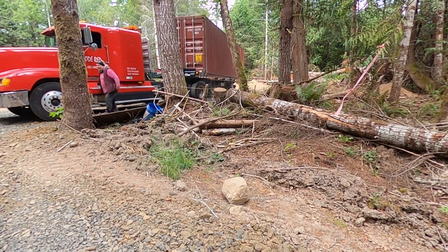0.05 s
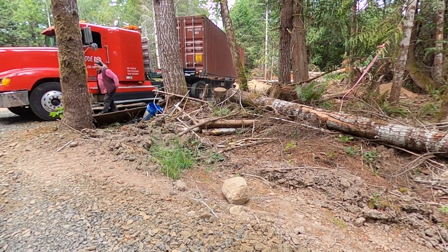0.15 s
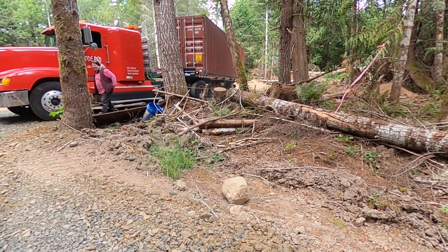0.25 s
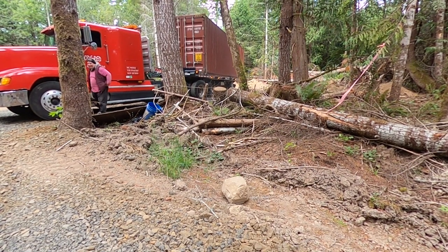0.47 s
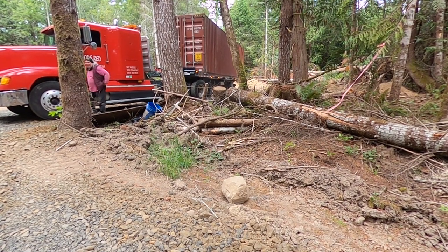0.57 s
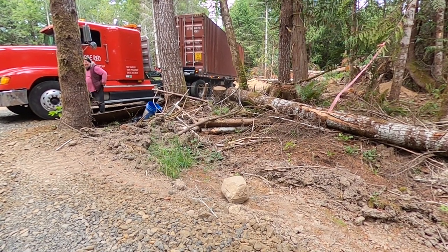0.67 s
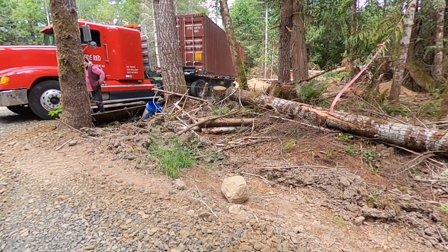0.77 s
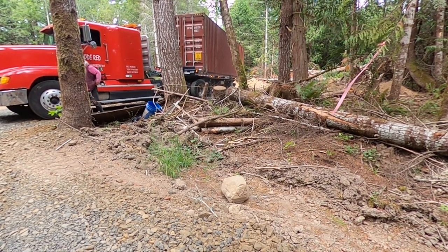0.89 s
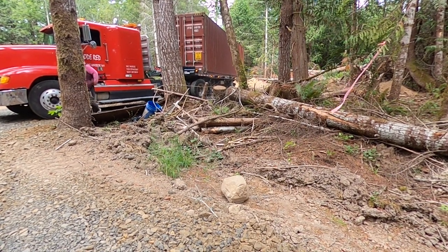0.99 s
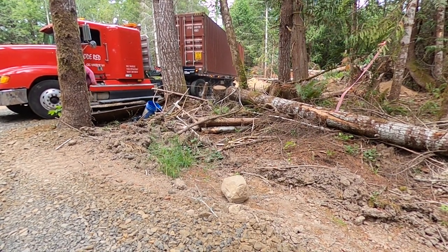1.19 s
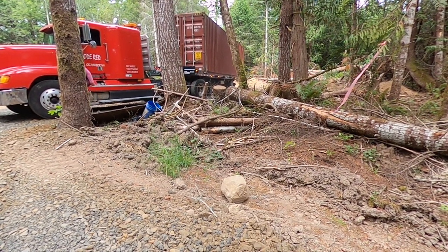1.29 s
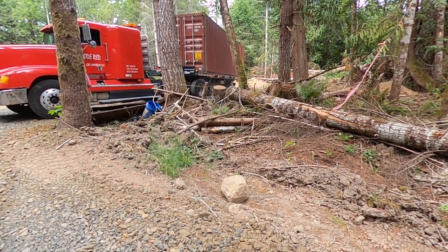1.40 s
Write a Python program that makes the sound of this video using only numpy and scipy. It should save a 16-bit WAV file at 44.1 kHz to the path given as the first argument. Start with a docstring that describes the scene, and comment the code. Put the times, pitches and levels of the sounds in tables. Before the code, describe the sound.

A heavy metal clunk on a truck at a wooded gravel site. Faint ticks begin at 0.15 seconds, then a loud, hard clack at 0.22 and a second, rattling hit near 0.3, with deep thuds until about 0.4. The trees scatter a short tail. Faint grit crunches around 0.6-0.75, a lighter hollow knock lands at 1.0, and tiny snaps follow near 1.15 and 1.4. Low fluttering engine rumble and soft air continue throughout.

```python
"""A heavy metal clunk beside a parked truck on a gravel forest road: light ticks, a hard double clack, a rattle and a deep thud.
Metal contacts are bursts of filtered noise plus ringing modes; soft pushes ring low body modes for the thud.
Clouds of tiny clicks make the rattle and crunching grit; a lighter, hollow knock follows, built like the clack.
The trees scatter all but the thud, over a low engine rumble of noise and fluttering harmonics, and forest air of noise."""
import sys
import numpy as np
from scipy import signal
from scipy.io import wavfile

SR = 44100
rng = np.random.default_rng(int(sys.argv[2]) if len(sys.argv) > 2 else 0)


def inscribe(sig):
    """Save sig as 16-bit PCM at rate SR to the path in sys.argv[1].

    A 1-D sig is mono; a 2-D sig holds one channel per row.
    Samples are clipped to [-1, 1] before scaling.
    """
    pcm = np.round(np.clip(np.atleast_2d(sig).T, -1, 1) * 32767)
    wavfile.write(sys.argv[1], SR, pcm.astype(np.int16))


N = 63945
T = np.arange(N) / SR  # time in seconds
EDGES = 18 * 2 ** (np.arange(30) / 3)  # third-octave band edges in Hz


def from_db(db):
    """Decibels to gain."""
    return 10 ** (np.asarray(db) / 20)


def rms_one(x):
    """Scale to unit rms."""
    return x / np.sqrt(np.mean(x ** 2) + 1e-20)


def at_hz(points, hz):
    """Read a curve of (Hz, dB) on a log-frequency axis."""
    table = np.array(points)
    return np.interp(np.log(hz), np.log(table[:, 0]), table[:, 1])


def level_curve(points):
    """Gain over time, drawn in straight dB lines between points of (s, dB)."""
    return from_db(np.interp(T, *np.transpose(points)))


def dying(t, t60):
    """Exponential decay from t = 0, losing 60 dB in t60 seconds; silent before."""
    return (t >= 0) * np.exp(-np.log(1000) * np.maximum(t, 0) / t60)


def bands(spectrum):
    """Third-octave bands as (centre Hz, filter, gain); together they give unit noise about unit rms."""
    centres = np.sqrt(EDGES[1:] * EDGES[:-1])
    gains = from_db(at_hz(spectrum, centres))
    gains = gains / np.sqrt(np.sum(gains ** 2 * np.diff(EDGES)) * 2 / SR)
    filters = [signal.butter(2, EDGES[k:k + 2], "band", fs=SR, output="sos") for k in range(len(centres))]
    return list(zip(centres, filters, gains))


# Stereo width of the blows. Each row: frequency in Hz, side level in dB against the middle.
BLOW_WIDTH = [(30, -43), (850, -43), (1400, -16), (5000, -14), (9000, -12.5), (14000, 1)]
# Lean of the blows across the stereo image. Each row: frequency in Hz, left minus right in dB.
BLOW_LEAN = [(30, 1.5), (850, -0.5), (1300, 0), (2800, 2), (5500, 0.5), (9000, 2.5), (14000, 4)]


def spread(mid, side, hz, width=BLOW_WIDTH, lean=1):
    """Place one band in stereo, with the width and left-right lean of its frequency."""
    sign = np.array([[1], [-1]])  # left, right
    stereo = mid + sign * side * from_db(at_hz(width, hz))
    return stereo * from_db(sign * lean * at_hz(BLOW_LEAN, hz) / 2)


ACCENT_OCTAVES = 0.15  # width of the range that a point of contact favours


def accent(hz, centre_hz, db):
    """Extra dB for the resonances that a point of contact favours."""
    return db * np.exp(-.5 * (np.log2(hz / centre_hz) / ACCENT_OCTAVES) ** 2)


def contact_db(row, hz):
    """Level of one contact at one frequency: its level, its tilt about 2 kHz and its accent."""
    _, db, tilt, centre, extra = row
    return db + tilt * np.log2(hz / 2000) + accent(hz, centre, extra)


TREBLE_DAMPING = 0.21  # power of frequency by which decays shorten
ATTACK_CYCLES = 0.86  # each resonance of a blow takes about this many cycles to build


def blows(rows, spectrum, t60):
    """Each contact sets off a dense cluster of dying resonances, the treble dying first; t60 holds at 1 kHz."""
    out, white = 0, rng.standard_normal((2, 2, N))
    for k, (hz, sos, gain) in enumerate(bands(spectrum)):
        if hz < spectrum[0][0]:
            continue
        life = t60 * (hz / 1000) ** -TREBLE_DAMPING
        # power falls twice as fast in dB as amplitude would, hence half the life
        power = sum(from_db(contact_db(row, hz)) ** 2 * dying(T - row[0], life / 2) for row in rows)
        r = np.exp(-hz / (ATTACK_CYCLES * SR))
        envelope = signal.lfilter([1 - r], [1, -r], np.sqrt(power) + 1e-18)
        noise = signal.sosfilt(sos, spread(*white[k % 2], hz))
        out = out + gain * envelope * noise
    return out


def ring(force, hz, t60):
    """A resonator: a unit click sets a dying sine of starting height 1 ringing."""
    r, w = np.exp(-np.log(1000) / (t60 * SR)), 2 * np.pi * hz / SR
    return signal.lfilter([0, np.sin(w)], [1, -2 * r * np.cos(w), r * r], force + 1e-18)


def struck(rows, modes, spread_db):
    """Every contact strikes every mode with a strength of its own."""
    out, luck = 0, rng.standard_normal((len(rows), len(modes)))
    places = (np.array([row[0] for row in rows]) * SR).astype(int)
    for k, (hz, mode_db, t60) in enumerate(modes):
        strengths_db = np.array([contact_db(row, hz) for row in rows]) + mode_db + spread_db * luck[:, k]
        clicks = np.zeros(N)
        clicks[places] = from_db(strengths_db)
        out = out + spread(ring(clicks, hz, t60), 0, hz)
    return out


def grains(swells, spectrum, per_s, spread_db):
    """Swells of many tiny uneven clicks, coloured band by band."""
    power = 0
    for s, db, rise, t60 in swells:
        shape = np.where(T < s, np.exp(-((T - s) / rise) ** 2), dying(T - s, t60))
        power = power + (from_db(db) * shape) ** 2
    sizes = from_db(spread_db * np.minimum(rng.exponential(1, N), 3))
    sizes = sizes * (rng.random(N) < per_s / SR)  # thin out to per_s clicks a second
    clicks = np.sqrt(power) * rms_one(sizes) * rng.choice([-1, 1], (2, 2, N))
    out = 0
    for k, (hz, sos, gain) in enumerate(bands(spectrum)):
        if hz > spectrum[0][0]:
            out = out + gain * signal.sosfilt(sos, spread(*clicks[k % 2], hz) + 1e-18)
    return out


# Stereo width of the background noise. Each row: frequency in Hz, side level in dB against the middle.
AIR_WIDTH = [(60, -20.5), (110, -19.5), (200, -14.5), (380, -10), (700, -17.5), (1290, -2), (2380, 1),
             (4400, -3.5), (8120, -14), (15000, 3)]


def wash(spectrum, levels):
    """Coloured noise, scaled to unit rms, that follows a level curve."""
    white = rng.standard_normal((2, 2, N + SR // 2))  # the first half second lets the filters settle
    noise = 0
    for k, (hz, sos, gain) in enumerate(bands(spectrum)):
        noise = noise + gain * signal.sosfilt(sos, spread(*white[k % 2], hz, AIR_WIDTH, lean=0))
    return rms_one(noise[:, -N:]) * level_curve(levels)


# Colour of the forest air; only its shape counts. Each row: frequency in Hz, density in dB per Hz.
AIR_COLOUR = [(250, -5), (400, -7.5), (530, -7), (780, -22.5), (1050, -12), (1250, -13.5), (1550, -11.5),
              (1850, -16), (2200, -19), (3400, -23.5), (4600, -28.5), (6800, -23.5), (9500, -41.5),
              (12000, -37.5), (15000, -48)]
# Loudness of the air. Each row: time in seconds, level in dB.
AIR_LOUDNESS = [(0, -63), (.11, -66.5), (.55, -72), (.7, -71), (0.919, -67.5), (1.1, -69), (1.24, -73),
                (1.4, -66.5), (1.45, -69.5)]


def forest_air():
    """Broad noise whose level wanders."""
    return wash(AIR_COLOUR, AIR_LOUDNESS)


# Colour of the engine rumble; only its shape counts. Each row: frequency in Hz, density in dB per Hz.
RUMBLE_COLOUR = [(20, 2.5), (40, 4.5), (65, 7.5), (100, 1), (140, -3), (200, -9.5), (270, -14.5),
                 (400, -26.5), (650, -46), (1200, -56.5)]
# Loudness of the rumble. Each row: time in seconds, level in dB.
RUMBLE_LOUDNESS = [(0, -55), (.1, -52), (.55, -51), (.64, -54), (.73, -52), (.86, -57), (0.929, -51.5),
                   (1.02, -58), (1.1, -55.5), (1.2, -56), (1.45, -57.5)]


def rumble():
    """Bass-heavy noise, rising and sinking."""
    return wash(RUMBLE_COLOUR, RUMBLE_LOUDNESS)


def drift(rate):
    """Slow random wander of unit rms: noise through two equal low-pass poles at rate Hz."""
    r = np.exp(-2 * np.pi * rate / SR)
    return rms_one(signal.lfilter([1], [1, -2 * r, r * r], rng.standard_normal(2 * N))[N:])


IDLE_HZ, IDLE_WAVER = 64.45, .012  # mean firing rate of a distant engine; rms share by which it wanders
IDLE_FLUTTER = 0.6  # depth of each harmonic's flutter
# Harmonics of the engine. Each row: multiple of the firing rate, level in dB before flutter and swell.
ENGINE_ORDERS = [(1, -70), (2, -64.5), (3, -66), (4, -73.5), (5, -79.5), (6, -78)]
# Swell of the engine. Each row: time in seconds, added level in dB.
ENGINE_SWELL = [(0, -8), (.5, -2), (.65, -4), (.85, -1), (1.08, 2.5), (1.25, -5), (1.45, 3.5)]


def engine():
    """A faint engine hum: a few fluttering multiples of the wandering firing rate."""
    phase = 2 * np.pi * np.cumsum(IDLE_HZ * (1 + IDLE_WAVER * drift(3.34))) / SR
    hum = 0
    for multiple, db in ENGINE_ORDERS:
        flutter = 1 + IDLE_FLUTTER * drift(8.2)
        tone = np.sin(round(multiple) * phase + rng.uniform(0, 2 * np.pi))
        hum = hum + np.sqrt(2) * from_db(db) * flutter * tone
    return hum * level_curve(ENGINE_SWELL)


WOODS_T60_S, WOODS_BUILD_S = 0.4, 0.0051
# Scatter from the trunks. Each row: frequency in Hz, level in dB against the direct sound.
WOODS_SCATTER = [(100, -1.5), (500, -8), (680, -13), (850, -11), (1100, -4.5), (1600, -11), (4000, -12.5),
                 (8000, -11.5), (15000, -17)]


def woods(x):
    """Diffuse scatter from trunks and ground that builds quickly and dies away."""
    shape = dying(T, WOODS_T60_S) * (1 - np.exp(-T / WOODS_BUILD_S))
    white = rng.standard_normal((2, 2, N)) * shape / np.sqrt(np.sum(shape ** 2))
    echo = 0
    for k, (hz, sos, _) in enumerate(bands(WOODS_SCATTER)):
        echo = echo + from_db(at_hz(WOODS_SCATTER, hz)) * signal.sosfilt(sos, spread(*white[k % 2], hz, lean=0))
    return signal.fftconvolve(x, echo, axes=1)[:, :N]


SNAP_T60_S = 0.018  # at 1 kHz
GRIT_PER_S, GRIT_SPREAD_DB = 2100, -1.5  # clicks a second; unevenness of their sizes
# Grit snapping. Each row: start in seconds, level in dB, treble tilt in dB per octave,
# favoured frequency in Hz, its accent in dB.
GRIT_SNAPS = [(.5652, -63.5, -2.5, 2880, 3), (.5886, -57, 0, 3100, 7.5), (.63, -52, -12, 2400, -1),
              (.6974, -66.5, 2, 5100, 12.5), (.7193, -61.5, 6, 7700, 7), (.739, -66, 4, 2960, 7),
              (1.155, -68, 3, 1300, 19), (1.3928, -65, 3, 5500, 3)]
# Grit crunching. Each row: time of the top in seconds, level in dB, rise in seconds, t60 in seconds.
GRIT_CRUNCHES = [(.03, -71, 0.06, 0.95), (.6, -74, 0.052, 0.72), (.652, -67, 0.047, 0.17),
                 (.73, -73, 0.058, 0.24), (1.41, -75, 0.029, 0.47)]
# Colour of the grit; only its shape counts. Each row: frequency in Hz, density in dB per Hz.
GRIT_COLOUR = [(500, -44), (1500, -28), (2300, 2), (3100, -0.5), (4500, -15), (7500, -14), (10000, -55),
               (15000, -20)]


def grit():
    """Gravel and dry needles crunch faintly, with single snaps."""
    snaps = blows(GRIT_SNAPS, GRIT_COLOUR, SNAP_T60_S)
    return snaps + grains(GRIT_CRUNCHES, GRIT_COLOUR, GRIT_PER_S, GRIT_SPREAD_DB)


KNOCK_T60_S, KNOCK_RING_DB = .05, -11  # decay of the noise at 1 kHz; gain of the ringing modes
# Touches of the knock. Each row: start in seconds, level in dB, treble tilt in dB per octave,
# favoured frequency in Hz, its accent in dB.
KNOCK_TOUCHES = [(1.0007, -51, -2, 3060, 4), (1.0035, -52.5, -0.5, 900, 4.5), (1.008, -53.5, -1, 7700, 1),
                 (1.026, -64.5, -6.5, 740, 4), (1.04, -64.5, -5, 863, 16.5)]
# Colour of the knock; only its shape counts. Each row: frequency in Hz, density in dB per Hz.
KNOCK_COLOUR = [(200, -17), (420, 6), (700, 0), (1000, 4), (1750, -0.5), (2200, -12), (3200, -6.5),
                (4500, -20), (7700, -9), (9500, -93), (15000, -52)]
# Modes of the hollow body. Each row: frequency in Hz, relative level in dB, t60 in seconds.
HOLLOW_MODES = [(412, -4, .09), (540, -4, 0.093), (749, -5, 0.13), (946, 0.5, 0.096), (1085, -11, 0.093),
                (1910, -3, .06), (2600, -7, .05), (3300, -11, 0.073), (7540, -9, 0.043)]


def knock():
    """A light hollow knock that settles in a few dull touches."""
    modes = struck(KNOCK_TOUCHES, HOLLOW_MODES, spread_db=1.5)
    return blows(KNOCK_TOUCHES, KNOCK_COLOUR, KNOCK_T60_S) + from_db(KNOCK_RING_DB) * modes


# Heavy pushes on the body. Each row: start in seconds, level in dB, contact time in seconds,
# favoured frequency in Hz, its accent in dB.
BODY_PUSHES = [(0.192, -39, 0.0071, 93.4, 18), (0.232, -21.5, 0.0034, 148, 3),
               (0.248, -22.5, 0.013, 42, 10), (0.312, -24.5, 0.0056, 95.5, 9),
               (0.344, -26, 0.00643, 84.04, 20.5), (0.381, -41, 0.00558, 166, 12),
               (0.417, -40.5, .006, 94.4, 18), (.476, -42, 0.0089, 45.2, 12),
               (0.501, -57, 0.0039, 78.8, 24), (0.704, -41.5, 0.0086, 63, -14),
               (0.91, -61, 0.023, 43.6, 11), (1.072, -46, 0.01, 73, 0)]
# Modes of the body. Each row: frequency in Hz, relative level in dB, t60 in seconds.
BODY_MODES = [(44.6, -3, 0.23), (75.53, -10.5, 0.47), (96.6, -5.5, 0.18), (152.6, -1, 0.12),
              (173.6, -3, 0.23), (234.3, -0.5, .13), (273.5, -0.5, 0.12), (356, -10, 0.085)]


def thud():
    """Soft pushes ring the body's low modes; a longer contact gives a deeper thud."""
    s, db, length, centre, extra = np.transpose(BODY_PUSHES)
    pushes = np.sin(np.pi * np.clip((T - s[:, None]) / length[:, None], 0, 1)) ** 2
    pushes = pushes / pushes.sum(axis=1, keepdims=True)  # equal total push
    out = 0
    for hz, mode_db, t60 in BODY_MODES:
        force = from_db(db + mode_db + accent(hz, centre, extra)) @ pushes
        out = out + ring(force, hz, t60)
    return out


CLACK_T60_S, CLACK_RING_DB = 0.058, -16  # decay of the noise at 1 kHz; gain of the ringing modes
RATTLE_PER_S, RATTLE_SPREAD_DB = 4000, 4  # clicks a second; unevenness of their sizes
# Metal contacts. Each row: start in seconds, level in dB, treble tilt in dB per octave,
# favoured frequency in Hz, its accent in dB.
METAL_CONTACTS = [(.1525, -69, 2.5, 7340, 19), (.1615, -63.5, -3, 1464, 25.5), (.1625, -70, 5, 7500, 8),
                  (.171, -69.5, 4, 7200, 19), (.179, -66, -4, 700, 10), (.191, -63, -9.5, 600, -24),
                  (.202, -57.5, 0.5, 1400, 17), (.2224, -35, -1.5, 6000, 1), (.2295, -34, -1.5, 3150, 7),
                  (.232, -45, 2.5, 533, -3), (.2403, -45.5, 5, 790, 19), (.2555, -55.5, 5.5, 3900, 12),
                  (.2828, -45.5, 4.5, 6100, 4), (.2935, -47.5, 3.5, 645, 23), (.302, -47.5, -1, 1430, 9),
                  (.3505, -53.5, 0, 1310, 6)]
# Colour of the clack; only its shape counts. Each row: frequency in Hz, density in dB per Hz.
CLACK_COLOUR = [(200, 4.5), (550, -2), (1100, -2.5), (2200, -4.5), (3200, -2), (4500, -4.5), (7000, -10.5),
                (11000, -24.5), (15000, -46)]
# Modes of the metal. Each row: frequency in Hz, relative level in dB, t60 in seconds.
METAL_MODES = [(548, 9, .075), (684, 4, .15), (3149, 7, .06), (5900, -1, .04), (948, -3, .2),
               (1244, 2, .06), (1440, -1, .1), (1906, -12, .08), (2950, -6, .08), (3919, -15, .07),
               (4414, -15, .06), (5400, -10, .05), (7564, -19, .035), (8570, -15, .04), (10790, -27, .04)]
# Loose parts shaken by the blow. Each row: time of the top in seconds, level in dB, rise in seconds,
# t60 in seconds.
LOOSE_PARTS = [(.2, -55, 0.026, 0.45), (.236, -46, 0.0085, 0.71), (.303, -43.5, 0.0083, 0.16),
               (.445, -64.5, 0.023, 0.053)]
# Colour of the rattle; only its shape counts. Each row: frequency in Hz, density in dB per Hz.
RATTLE_COLOUR = [(150, 1.5), (350, 2), (650, 2), (1400, -3.5), (2400, -12), (4000, -14), (7500, -27),
                 (11000, -30.5), (15000, -52)]


def clunk():
    """Metal meets metal, rings briefly and shakes its loose parts."""
    clacks = blows(METAL_CONTACTS, CLACK_COLOUR, CLACK_T60_S)
    modes = struck(METAL_CONTACTS, METAL_MODES, spread_db=1.5)
    rattle = grains(LOOSE_PARTS, RATTLE_COLOUR, RATTLE_PER_S, RATTLE_SPREAD_DB)
    return clacks + from_db(CLACK_RING_DB) * modes + rattle


def scene():
    """The blows and their scatter, over the rumble and the forest air."""
    background = forest_air() + rumble() + engine()
    small = grit() + knock()
    loud = clunk()
    scatter = woods(loud + from_db(-5.5) * small)
    return background + scatter + small + thud() + loud


CUTOFF_HZ = 15300


def record(dry):
    """The deepest bass and the top are cut."""
    x = signal.sosfilt(signal.butter(2, 24, "high", fs=SR, output="sos"), dry)
    return signal.sosfilt(signal.cheby2(12, 70, CUTOFF_HZ, fs=SR, output="sos"), x)


dry = scene()
out = record(dry)
inscribe(out)
```